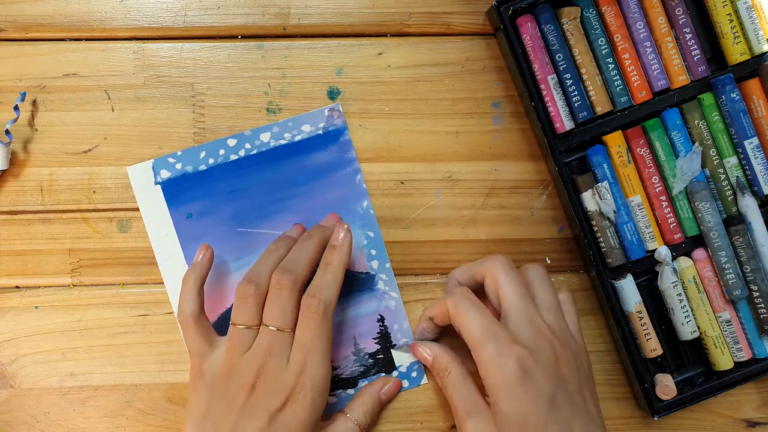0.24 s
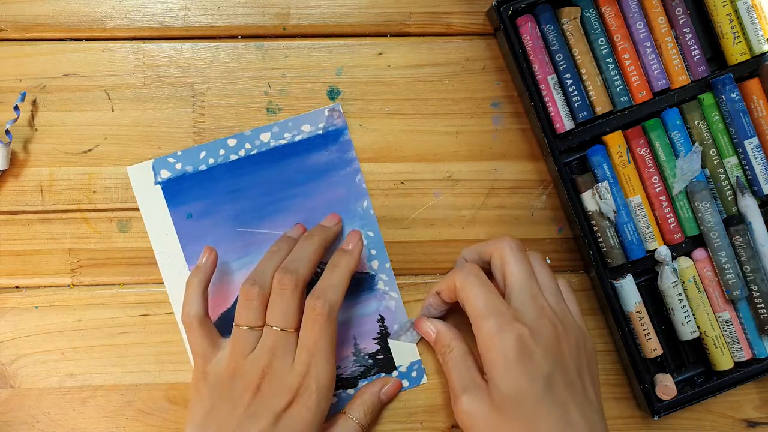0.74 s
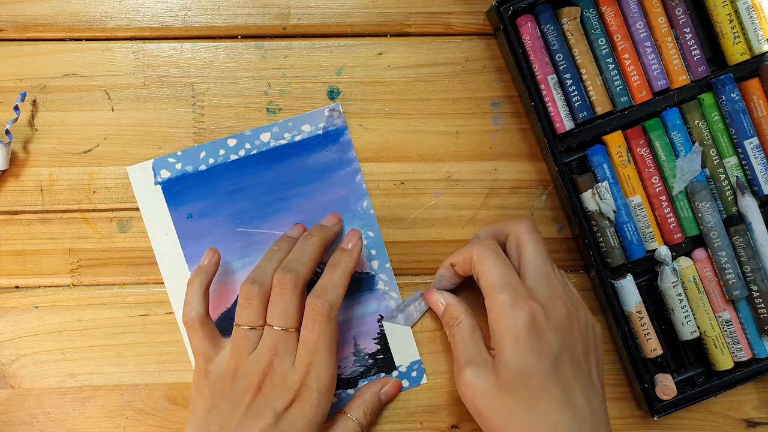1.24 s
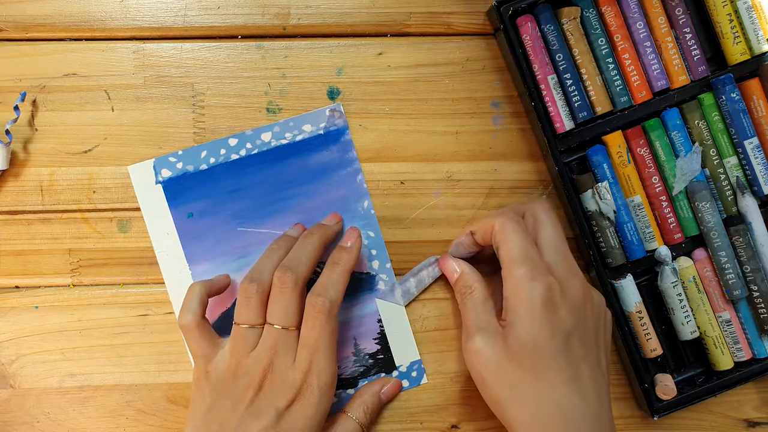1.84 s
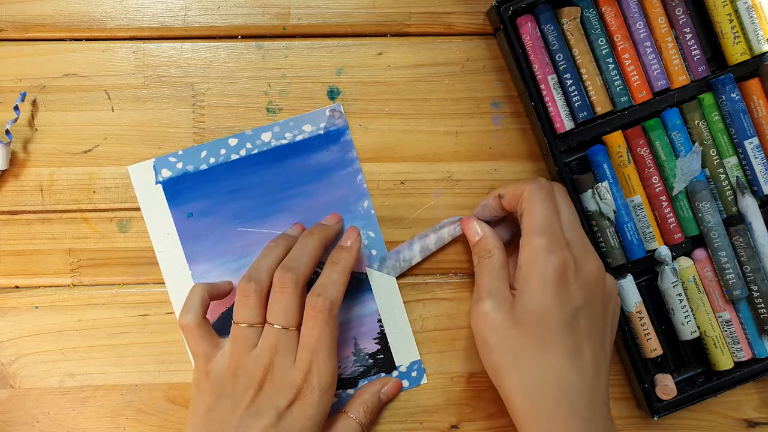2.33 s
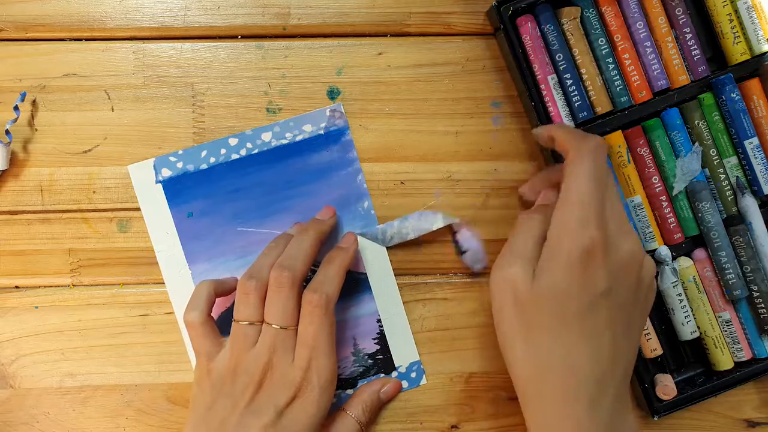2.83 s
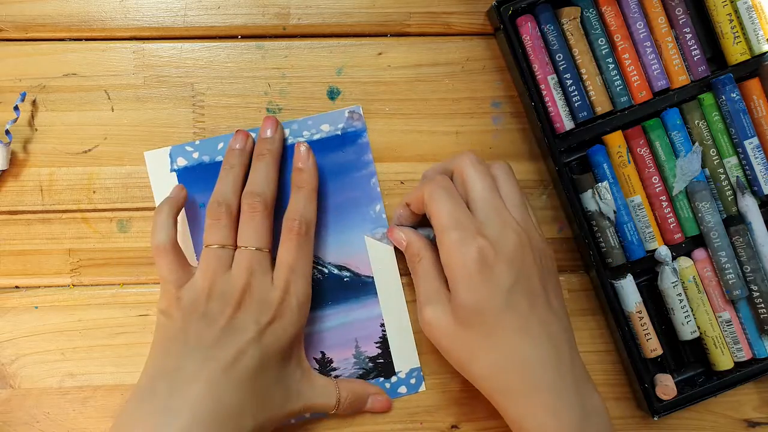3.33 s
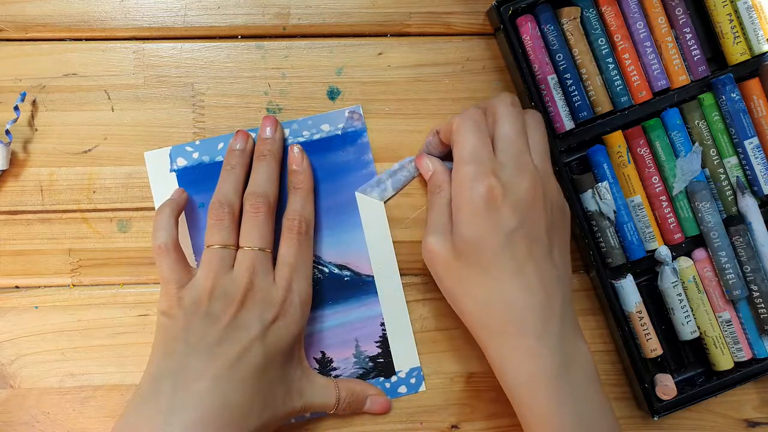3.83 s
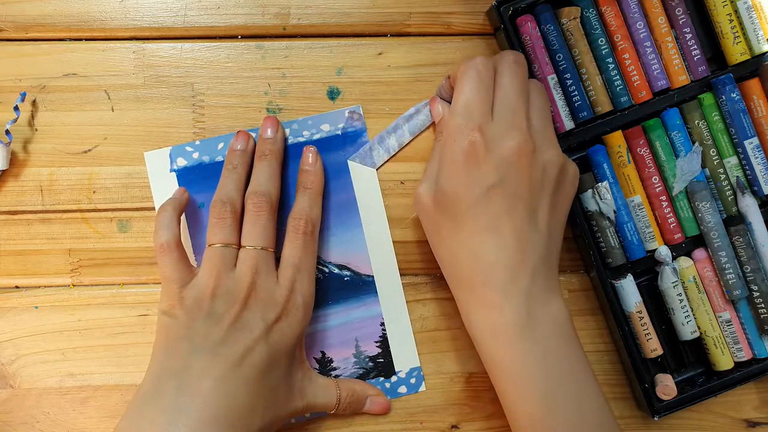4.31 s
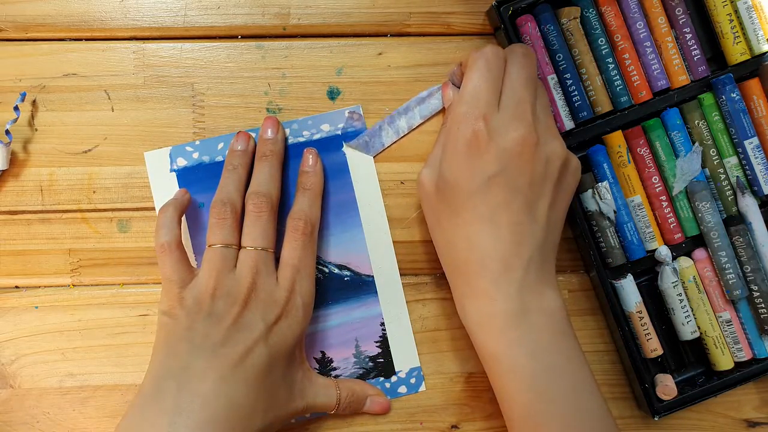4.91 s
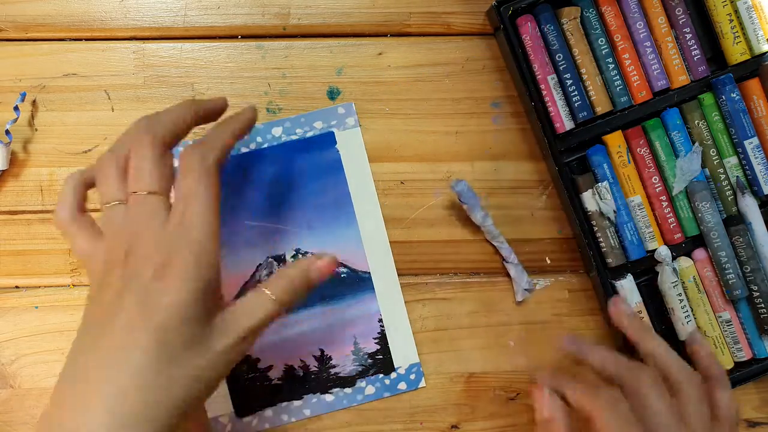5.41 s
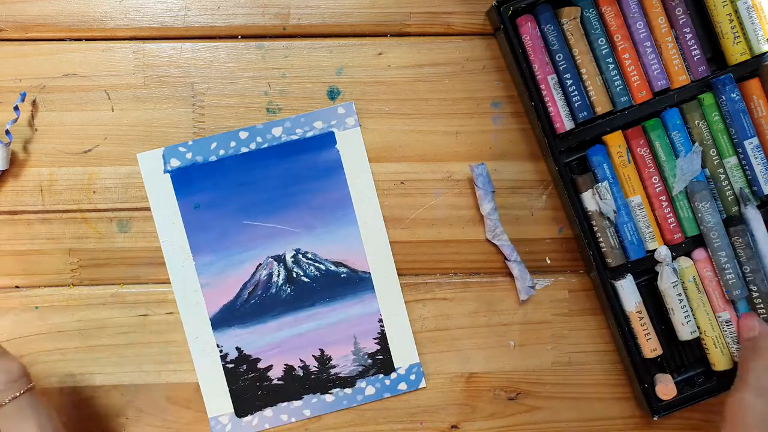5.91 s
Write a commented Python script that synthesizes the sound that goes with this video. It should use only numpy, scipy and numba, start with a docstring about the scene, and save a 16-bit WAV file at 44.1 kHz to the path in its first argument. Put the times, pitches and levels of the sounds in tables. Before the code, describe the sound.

A small room hums steadily with a low, softly throbbing drone, and a faint, distant engine climbs in pitch twice. Right at the start there is a light knock on a wooden desk. From about 0.4 seconds, masking tape is peeled off paper close by, in slow pulls and short tugs: a fine, dry, high crackle dotted with tiny snaps, growing fuller and slightly deeper as the strip lengthens. Near 2.8 seconds a patch rips loose, followed by a knock and, at about 3.1 seconds, a palm settling softly. The peeling resumes from 3.5 to 4.2 seconds, then pauses with a soft low bump. A last pull around 5 seconds ends in bright snaps and crinkles by 5.4 seconds. At about 5.7 seconds the sheet slides dully over the wood, and a light knock and faint rustles follow near 6 seconds.

```python
"""A small room hums, and a far engine climbs in pitch twice. After a knock on a wooden desk, masking
tape is peeled off a sheet of paper in slow pulls and short tugs: glue threads snap in a fine crackle
that deepens as the free strip grows. Near 3 s a patch rips loose, a hand knocks and the palm settles.
The peeling resumes and ends in bright snaps just after 5 s; then hands slide and knock the sheet."""
import sys
import numpy as np
from scipy import signal
from scipy.fft import rfft, irfft
from scipy.io import wavfile
from scipy.ndimage import uniform_filter1d
from numba import njit

SR = 44100
rng = np.random.default_rng(int(sys.argv[2]) if len(sys.argv) > 2 else 0)


def wrap_up_sound(samples):
    """Save the sound to the file named by the first command line argument, as 16-bit audio."""
    columns = np.atleast_2d(samples).T
    # keep every value between -1 and 1, then stretch to whole-number steps
    tamed = np.clip(columns, -1, 1)
    steps = np.round(tamed * 32767).astype(np.int16)
    wavfile.write(sys.argv[1], SR, steps)


N = 271347
TIME = np.arange(N) / SR
BIN_HZ = np.arange(N // 2 + 1) * SR / N


def from_db(db):
    """Decibels to gain."""
    return 10 ** (np.asarray(db) / 20)


def unit_rms(x):
    """Scale to unit power."""
    return x / np.sqrt(np.mean(x ** 2) + 1e-20)


def in_time(rows):
    """Each column of a time curve at every sample."""
    times_s, *columns = np.transpose(rows)
    return [np.interp(TIME, times_s, column) for column in columns]


def at_hz(points, hz):
    """Read a table on a log-frequency axis."""
    known_hz, values = np.transpose(points)
    return np.interp(np.log(hz + 1e-3), np.log(known_hz), values)


def pan(balance_db):
    """Channel gains for a left-minus-right balance."""
    return from_db(np.array([[.5], [-.5]]) * balance_db)


def drift(rate_hz):
    """Slow random curve, rms 1."""
    return unit_rms(irfft(rfft(rng.standard_normal(N)) / (1 + (BIN_HZ / rate_hz) ** 2), N))


def strokes(rows, rise_s, fall_s):
    """Envelope of events that build up, hold and die away; their powers add."""
    power = np.zeros(N)
    for start_s, length_s, db in rows:
        outside = np.maximum(start_s - TIME, 0) / rise_s
        outside += np.maximum(TIME - start_s - length_s, 0) / fall_s
        power += (from_db(db) * np.exp(-np.minimum(outside, 20))) ** 2
    return np.sqrt(power)


def highpass(order, hz):
    """Butterworth high-pass sections."""
    return signal.butter(order, hz, "high", fs=SR, output="sos")


def resonate(x, hz, width_hz):
    """Two-pole resonance, peak gain 1."""
    r = np.exp(-np.pi * width_hz / SR)
    feedback = [1, -2 * r * np.cos(2 * np.pi * hz / SR), r * r]
    return signal.lfilter(np.array([1, 0, -1]) * (1 - r * r) / 2, feedback, x + 1e-18)


def narrow_band(noise, hz, stage_width_hz):
    """Noise through two equal resonances in series, rms 1."""
    return unit_rms(resonate(resonate(noise, hz, stage_width_hz), hz, stage_width_hz))


@njit
def moving_filter(x, step, damping):
    """State-variable filter tuned by step = tan(pi hz / SR); returns high-pass and band-pass."""
    high, peak, band, low = np.zeros(len(x)), np.zeros(len(x)), 0., 0.
    for i in range(len(x)):
        g = step[i]
        high[i] = (x[i] - (damping + g) * band - low) / (1 + g * (damping + g))
        peak[i] = band + g * high[i]
        low += 2 * g * peak[i]
        band += 2 * g * high[i]
    return high, damping * peak


# Stereo image. Each row: frequency in Hz, left-right correlation.
EAR_CORRELATION = [(30, 0.76), (70, 0.99), (140, 0.97), (290, 0.97), (640, 0.51), (1410, 0.36), (3100, 0),
                   (15000, 0.14)]

def two_ears(mid, side, hz):
    """Left and right are alike in the bass, nearly unrelated in the treble."""
    alike = np.clip(at_hz(EAR_CORRELATION, hz), -1, 1)
    return np.sqrt(1 + alike) * mid + np.sqrt(1 - alike) * side * [[1], [-1]]


# Balance of diffuse sound. Each row: frequency in Hz, left minus right in dB.
ROOM_BALANCE = [(60, 2.5), (130, 0), (290, -2.5), (640, 0.2), (1410, 1.5), (8000, 1)]

def room_noise(spectrum):
    """Diffuse stereo noise of a given spectrum, rms 1."""
    ears = two_ears(*rfft(rng.standard_normal((2, N))), BIN_HZ)
    coloured = ears * from_db(at_hz(spectrum, BIN_HZ))
    return unit_rms(irfft(coloured * pan(at_hz(ROOM_BALANCE, BIN_HZ)), N))


# Background spectrum. Each row: frequency in Hz, relative density in dB.
AIR_SPECTRUM = [(20, -17), (50, -25), (75, -4), (110, 2.5), (170, 1), (280, -6.5), (420, -17), (700, -16),
                (1300, -19), (2000, -28.5), (2800, -37), (4500, -41), (8000, -46), (15000, -59.5)]
# Background swell. Each row: time in seconds, level in dB.
AIR_LEVEL = [(0.25, -54), (0.7, -56.5), (1.8, -55), (2.6, -54.5), (3.3, -55), (4.0, -53.5), (6.0, -55.5)]
# Room resonances. Each row: frequency in Hz, width in Hz, level in dB.
AIR_MODES = [(290.5, 28, -67), (346.3, 16, -69.5), (438.2, 6.6, -74.5), (540, 50, -67), (948, 47, -72),
             (1400, 22, -80.5), (2000, 38, -93)]

def air():
    """Near-steady rumble and hiss, with a few room resonances standing out."""
    white = room_noise([(20, 0), (20000, 0)])
    modes = sum(from_db(db) * narrow_band(white, hz, 1.57 * width_hz) for hz, width_hz, db in AIR_MODES)
    return from_db(in_time(AIR_LEVEL)[0]) * room_noise(AIR_SPECTRUM) + modes


# The engine climbs, lets off, climbs again. Each row: time in seconds, firing rate in Hz, level in dB.
ENGINE_RUN = [(0.0, 147, -63), (0.84, 159, -66), (0.93, 161, -56), (1.14, 166, -58), (1.24, 168, -51.5),
              (1.46, 169, -64.5), (1.58, 174, -53.5), (1.8, 180, -54), (2.25, 184, -57), (2.65, 188, -56.5),
              (2.92, 196, -56), (3.05, 198, -58), (3.4, 103, -60), (4.2, 119, -64), (4.75, 129, -58.5),
              (5.4, 134, -50), (6.15, 138, -65)]
# Firing orders. Each row: multiple of the firing rate, relative level in dB.
ENGINE_ORDERS = [(1, 5), (2, -20), (3, -16), (4, -20)]

def engine(jitter=0.0088, flutter_db=3, mode_hz=555, mode_half_width_hz=16, mode_db=13):
    """Only the lowest firing orders come indoors; one that crosses a room resonance swells."""
    firing_hz, level_db = in_time(ENGINE_RUN)
    phase = 2 * np.pi * np.cumsum(firing_hz * (1 + jitter * drift(12.8))) / SR
    orders = 0
    for order, db in ENGINE_ORDERS:
        swell_db = mode_db / (1 + ((order * firing_hz - mode_hz) / mode_half_width_hz) ** 2)
        orders += from_db(db + swell_db + flutter_db * drift(8)) * np.sin(order * phase)
    return from_db(level_db) * unit_rms(orders) * pan(-0.37)


# Low drone of the room. Each row: time in seconds, level in dB.
DRONE_LEVEL = [(0.0, -48.5), (0.42, -50.5), (0.65, -60), (1.35, -59.5), (2.05, -51), (2.3, -58), (2.8, -52),
               (3.3, -57.5), (3.85, -54), (4.15, -63.5), (5.0, -66.5), (5.55, -50), (6.15, -55.5)]
# Booms in the hum. Each row: start in seconds, length in seconds, level in dB, pitch in Hz.
HUM_BOOMS = [(0.036, 0.032, -42.5, 113.2), (0.258, 0.016, -44.5, 111.9), (0.477, 0.02, -45.5, 118.7),
             (0.717, 0.013, -49.5, 118.7), (1, 0.02, -45, 117), (1.463, 0.078, -44, 117.6),
             (3.117, 0.097, -46, 112.6), (3.57, 0.056, -45.5, 105), (3.765, .02, -51, 112.7),
             (3.834, 0.067, -46.5, 111.1), (4.012, 0.057, -40.5, 112), (4.219, 0.072, -43, 118.6),
             (4.327, 0.034, -33, 114.3), (4.409, 0.011, -40, 119.8), (4.523, 0.033, -43, 109.1),
             (4.648, 0.034, -43, 123.1), (4.747, 0.028, -46, 123.2), (4.838, 0.014, -49, 113.6),
             (4.935, 0.024, -44, 118.5), (5.026, .025, -44.5, 118.6), (5.16, 0.012, -47, 118),
             (5.217, 0.023, -46.5, 128), (5.364, 0.013, -45, 114.7), (5.448, 0.024, -45, 118.5),
             (6.06, 0.03, -43.5, 113)]

def hum(drone_hz=112.3, wander_hz=6.86, flutter_db=2.0, lowest_hz=68):
    """A low drone wavers in pitch and level and throbs in soft booms."""
    flutter = from_db(flutter_db * drift(20))
    drone_phase = 2 * np.pi * np.cumsum(drone_hz + wander_hz * drift(13.12)) / SR
    drone = from_db(in_time(DRONE_LEVEL)[0]) * unit_rms(flutter * np.sin(drone_phase))
    boom_hz = in_time([(start_s + length_s / 2, hz) for start_s, length_s, _, hz in HUM_BOOMS])[0]
    boom_phase = 2 * np.pi * np.cumsum(boom_hz) / SR + rng.uniform(0, 2 * np.pi)
    boom_rms = strokes([row[:3] for row in HUM_BOOMS], rise_s=0.012, fall_s=0.018)
    booms = boom_rms * np.sqrt(2) * np.sin(boom_phase)
    return signal.sosfilt(highpass(4, lowest_hz), drone + booms) * pan(-0.6)


# Slides over the desk. Each row: start in seconds, length in seconds, level in dB.
PAPER_SLIDES = [(4.32, 0.05, -65), (5.707, 0.021, -48), (5.76, 0.049, -63), (6.142, 0.01, -59.5)]
# Rubbing spectrum. Each row: frequency in Hz, relative density in dB.
SLIDE_SPECTRUM = [(150, -11), (300, 1), (500, 10.5), (800, 3), (1300, 8), (2200, -5), (3100, -22),
                  (4500, -21.5), (7000, -42), (14000, -63)]

def slide(grain_db=2.0):
    """Paper and skin rub dully and unevenly over wood."""
    envelope = strokes(PAPER_SLIDES, rise_s=0.0049, fall_s=0.04)
    return envelope * from_db(grain_db * drift(90)) * room_noise(SLIDE_SPECTRUM)


# Palm landings. Each row: start in seconds, length in seconds, level in dB.
PALM_LANDINGS = [(3.125, 0.04, -51), (4.32, 0.027, -57)]
# Palm spectrum. Each row: frequency in Hz, relative density in dB.
PALM_SPECTRUM = [(80, -21), (170, 0), (300, 7.5), (450, -14), (1500, -22.5), (3000, -41), (12000, -66)]

def palm():
    """The holding hand settles softly on the sheet."""
    return strokes(PALM_LANDINGS, rise_s=0.012, fall_s=0.051) * room_noise(PALM_SPECTRUM)


# Centres of thud, body, clack and tick in Hz.
KNOCK_CENTRES_HZ = [220, 1400, 2900, 6500]

def knock_gain(knock, hz, bass_db=-3, top_db=-9):
    """How hard one knock drives a given frequency."""
    thud, body, clack, tick = knock[1:5]
    levels_db = [thud + bass_db, thud, body, clack, tick, tick + top_db]
    spectrum = list(zip([170, *KNOCK_CENTRES_HZ, 14000], levels_db))
    return from_db(at_hz(spectrum, hz))


# Knocks. Each row: start in seconds; thud, body, clack and tick drive in dB; relative desk ring in dB;
# the struck spot's pitch in Hz, level in dB and T60 in seconds.
DESK_KNOCKS = [(0.0681, -60, -56, -62, -57.5, 0, 3430, -68, 0.06),
               (0.0754, -39, -49, -63, -51.5, 4.5, 540, -41.5, 0.011),
               (0.0869, -42, -62, -58, -65, 1, 1390, -50, 0.02),
               (2.9461, -44, -52, -55.5, -56.5, -4, 1300, -52, 0.012),
               (2.9516, -59, -49.5, -53, -58, -8, 950, -44.5, 0.025),
               (5.8673, -62, -53, -60, -53.5, -15, 2000, -43.5, 0.028),
               (5.872, -55, -48.5, -65, -62, -14, 2250, -49, 0.015),
               (5.889, -76, -66, -57, -57, -12, 2160, -60, 0.056)]
# Decay of a knock's tail. Each row: frequency in Hz, T60 in seconds.
TAIL_T60 = [(200, 0.029), (1000, 0.34), (3500, 0.16), (14000, 0.13)]

def knocks(crack_t60_s=0.0085, tail_db=-8, gain_db=-12):
    """Fingers and tape strike desk and sheet: a short crack, then a tail that dies band by band."""
    out, t = np.zeros((2, N + SR)), TIME[:SR // 3]
    crack = from_db(-60 * t / crack_t60_s)
    edges_hz = np.geomspace(140, 16000, num=25)
    for low, high in zip(edges_hz, edges_hz[1:]):
        hz = np.sqrt(low * high)
        band = signal.butter(2, [low, high], "band", fs=SR, output="sos")
        tail = from_db(tail_db - 60 * t / at_hz(TAIL_T60, hz))
        for knock in DESK_KNOCKS:
            start = round(knock[0] * SR)
            decay = knock_gain(knock, hz) * (crack + tail)
            drive = two_ears(*rng.standard_normal((2, len(t))), hz) * decay
            out[:, start:start + len(t)] += signal.sosfilt(band, drive * np.sqrt(SR / (high - low)))
    return from_db(gain_db) * out[:, :N]


# Modes of desk and sheet. Each row: frequency in Hz, relative level in dB, T60 in seconds.
DESK_MODES = [(301, -6, 0.22), (542, 4.5, 0.2), (870, 5, 0.087), (1314, 0, 0.13), (1554, -4, 0.15),
              (1980, -3, 0.078), (3030, -9, 0.09), (3380, -8, 0.11), (4580, -16, 0.12)]

def desk_ring(modes_db=-11, cluster_hz=3280, cluster_db=-8, cluster_t60_s=0.17):
    """Each knock rings the desk's modes, a rough cluster of higher ones and the struck spot."""
    out = np.zeros((2, N))
    cluster = narrow_band(rng.standard_normal((2, N)), cluster_hz, stage_width_hz=560)
    for knock in DESK_KNOCKS:
        ring_db, spot_hz, spot_db, spot_t60_s = knock[5:]
        start = round(knock[0] * SR)
        t = TIME[:min(SR // 3, N - start)]
        span = slice(start, start + len(t))
        cluster_decay = from_db(cluster_db + ring_db - 60 * t / cluster_t60_s)
        out[:, span] += knock_gain(knock, cluster_hz) * cluster_decay * cluster[:, span]
        modes = [(hz, knock_gain(knock, hz) * from_db(db + ring_db + modes_db), t60_s)
                 for hz, db, t60_s in DESK_MODES]
        for hz, gain, t60_s in modes + [(spot_hz, from_db(spot_db), spot_t60_s)]:
            phase = 2 * np.pi * hz * t
            out[:, span] += gain * from_db(-60 * t / t60_s) * two_ears(np.sin(phase), np.cos(phase), hz)
    return out


# Resonances of tape and sheet. Each row: frequency in Hz, width in Hz, gain in dB.
SHEET_MODES = [(4950, 620, 0), (6280, 550, -8.5), (7030, 150, -5), (8030, 930, -13.5), (10560, 1400, -13),
               (12960, 720, -10.5), (15800, 1600, -13.5)]
# Modes of the free strip. Each row: multiple of the lowest, relative width, relative gain in dB.
STRIP_MODES = [(1, 0.07, -6), (1.41, 0.088, -8.5)]
# The free strip. Each row: time in seconds, lowest mode in Hz, radiation cutoff in Hz,
# treble gain in dB, left minus right in dB.
FREE_STRIP = [(0.72, 11300, 8800, -12, 10), (0.86, 8560, 7100, 0, 9), (1.3, 8450, 7560, 2, 12),
              (1.51, 8400, 7300, -7, 17), (1.56, 7150, 7020, -1, 13), (1.95, 7170, 6660, 13, 11),
              (2.3, 7100, 5770, 4, 3), (2.85, 7060, 5700, -5, 0.5), (3.5, 7340, 5377, -9, 9),
              (3.65, 6600, 5740, -2, 8), (3.82, 6060, 5230, 1, 6), (4.08, 6330, 5167, 6, 3),
              (4.95, 6770, 6170, 4, 6), (5.16, 7760, 6000, -17, 5), (5.26, 11000, 7680, 6, 1)]

def tape_body(ears, ring_db=0, broad_db=-20, crunch_db=-29, treble_hz=11000, wobble=0.033):
    """Snaps ring the sheet and the free strip; a short strip radiates only the highest tones."""
    strip_hz, cutoff_hz, treble_db, _ = in_time(FREE_STRIP)
    tone = sum(from_db(db) * resonate(ears, hz, width_hz) for hz, width_hz, db in SHEET_MODES)
    tone += from_db(broad_db) * ears
    strip_hz = strip_hz * (1 + wobble * drift(12))   # the strip tightens and slackens
    cutoff_step = np.tan(np.pi * cutoff_hz / SR)
    for ear in range(2):
        for multiple, width, db in STRIP_MODES:
            step = np.tan(np.pi * np.minimum(multiple * strip_hz / SR, 4 / 9))
            tone[ear] += from_db(db + ring_db) * moving_filter(ears[ear] + 1e-18, step, width)[1]
        for damping in (.22, .7, 1.2, 1.6, 1.85, 1.98):   # 12th-order high-pass
            tone[ear] = moving_filter(tone[ear], cutoff_step, damping)[0]
    treble = signal.sosfiltfilt(highpass(2, treble_hz), tone)
    crunch = from_db(crunch_db) * resonate(ears, hz=4000, width_hz=1500)
    return tone + (from_db(treble_db) - 1) * treble + crunch


def scatter(pulses, desk_db=-4, desk_t60_s=0.08, wall_db=-3, wall_t60_s=0.17):
    """Each pulse arrives directly, then scatters off desk and hands, then off the walls."""
    t = TIME[:SR // 3]
    desk = from_db(desk_db) * unit_rms(from_db(-60 * t / desk_t60_s))
    walls = from_db(wall_db) * unit_rms(from_db(-60 * t / wall_t60_s) * (t > .003))
    echo_power = signal.fftconvolve(pulses ** 2, (desk ** 2 + walls ** 2) / len(t))[:N]
    diffuse = np.sqrt(np.abs(echo_power)) * rng.standard_normal((2, N))
    direct = np.stack([pulses, np.roll(pulses, 1)])   # the right ear is a little farther
    balance_db = in_time(FREE_STRIP)[-1]
    return direct * pan(balance_db) + diffuse * pan(0.74)


def reflections(ears, echo_db=-17, count=6):
    """Hard surfaces nearby return a few early echoes, which comb the treble."""
    lags = (rng.uniform(.001, .012, count) * SR).astype(int)
    return ears + from_db(echo_db) * sum(np.pad(ears, ((0, 0), (lag, 0)))[:, :N] for lag in lags)


# Rips and rustles. Each row: start in seconds, length in seconds, drive in dB, relative crunch in dB.
TAPE_RIPS = [(2.786, 0.0022, -56, -13), (2.794, 0.1, -82, 1), (2.826, 0.033, -68.5, -9.5),
             (2.916, 0.0021, -65, -1), (4.119, 0.0048, -85, 15.5), (5.129, 0.036, -60.5, -7.5),
             (5.276, 0.022, -71, -7.5), (5.353, 0.023, -71.5, -4), (5.934, 0.03, -90.5, 15),
             (6.027, 0.025, -94.5, 16), (6.081, 0.0038, -80, 4)]

def rips(tape_gain_db=4, crunch_gain_db=8, grain_db=3):
    """A patch of glue lets go in a dense run of clicks, and the paper crunches under it."""
    runs, crunches = np.zeros((2, N))
    for start_s, length_s, db, crunch_db in TAPE_RIPS:
        run = from_db(db) * ((TIME > start_s) & (TIME < start_s + length_s))
        runs += run
        crunches += from_db(crunch_db) * run
    threads = rng.standard_normal(N) * from_db(grain_db * drift(600))
    tape = tape_body(scatter(runs * threads), ring_db=-3, broad_db=-6.5)
    paper = resonate(scatter(crunches * threads), hz=2270, width_hz=2600)
    return from_db(tape_gain_db) * tape + from_db(crunch_gain_db) * paper


# Single glue snaps and crinkles. Each row: start in seconds, drive in dB, ring in Hz.
GLUE_SNAPS = [(0.3962, -47, 11500), (0.4261, -41, 12000), (0.681, -46, 11500), (1.29, -45, 8500),
              (1.3116, -45, 8500), (1.3497, -41, 8500), (1.3698, -42, 8500), (1.471, -45, 8500),
              (1.4866, -39, 8500), (1.4944, -46, 8500), (1.5487, -47, 8000), (1.7748, -47, 10200),
              (1.7804, -45, 10200), (1.9545, -40, 10500), (1.9911, -40, 10200), (2.0756, -43, 10000),
              (2.088, -43, 10000), (2.0985, -41, 7200), (2.158, -41, 7200), (2.2847, -42, 7200),
              (2.3045, -39, 7200), (2.3875, -43, 7200), (2.4155, -46, 10000), (2.5077, -43, 12500),
              (2.5384, -42, 7200), (2.6996, -40, 7000), (2.724, -46, 13000), (2.7772, -42, 8000),
              (2.7872, -38, 7300), (2.7893, -28, 7600), (2.7982, -42, 7400), (2.846, -34, 13000),
              (2.8595, -42, 8000), (2.9061, -44, 10500), (2.9174, -29, 8200), (4.0907, -41, 14500),
              (5.1342, -30.5, 12000), (5.1808, -37, 13000), (5.225, -49, 12000), (5.2412, -36, 12500),
              (5.2463, -28, 12000), (5.2685, -38, 10900), (5.3535, -47, 12500), (5.3688, -34, 12800)]

def snaps(ring_width_hz=1400, ring_db=3, click_db=-9, lowest_hz=6200):
    """A strong spot of glue gives way with one dry click, which rings its own patch of tape."""
    times_s, drives_db, rings_hz = np.transpose(GLUE_SNAPS)
    starts = [round(start_s * SR) for start_s in times_s]
    clicks = np.zeros(N)
    clicks[starts] = from_db(drives_db)
    ears = scatter(clicks, desk_db=-3, desk_t60_s=0.007, wall_t60_s=0.07)
    out = from_db(click_db) * ears
    for start, end, hz in zip(starts, starts[1:] + [N], rings_hz):
        out[:, start:end] += from_db(ring_db) * resonate(ears[:, start:end], hz, ring_width_hz)
    return signal.sosfilt(highpass(4, lowest_hz), out + 1e-18)


# Pulls: the tape creeps off steadily. Each row: start in seconds, length in seconds, drive in dB.
SLOW_PULLS = [(0.345, 0.4, -83.5), (1.03, 0.59, -79), (1.69, 1.03, -77), (3.47, 0.71, -73),
              (4.94, 0.13, -79.5)]
# Tugs: one burst of crackle each. Each row: start in seconds, length in seconds, drive in dB.
SHORT_TUGS = [(0.388, 0.12, -71.5), (0.533, 0.033, -76.5), (0.672, 0.026, -78), (0.891, 0.029, -68),
              (1.227, 0.069, -72), (1.31, 0.07, -68.5), (1.463, 0.03, -70), (1.869, 0.06, -68),
              (1.93, 0.034, -65), (2.089, 0.015, -65.5), (2.271, 0.038, -65.5), (2.367, 0.017, -69),
              (2.515, 0.043, -63.5), (2.591, 0.033, -66), (2.692, 0.01, -73.5), (3.2, 0.019, -82.5),
              (3.467, 0.016, -64), (3.613, 0.039, -67.5), (3.716, 0.086, -65), (3.827, 0.03, -61.5),
              (3.892, 0.013, -61.5), (3.972, 0.051, -68), (4.038, 0.029, -62.5), (4.419, 0.025, -80.5),
              (4.944, 0.015, -71), (5.058, 0.097, -70.5)]

def peel(reference_threads_per_s=2000, reference_db=-69.0, spread_db=2.0, flutter_db=1.0, gain_db=1.5):
    """Glue threads break at random; a faster pull breaks more of them, in uneven surges."""
    surge = strokes(SLOW_PULLS + SHORT_TUGS, rise_s=0.014, fall_s=0.017)
    surge *= from_db(flutter_db * drift(24))
    threads_per_s = reference_threads_per_s * np.sqrt(surge / from_db(reference_db))
    chance = np.clip(threads_per_s / SR, .004, .6)
    sizes = from_db(spread_db * np.minimum(rng.exponential(1, N), 5.5)) * rng.choice([-1, 1], N)
    breaks = sizes * (rng.random(N) < chance) / np.sqrt(chance)
    crackle = tape_body(reflections(scatter(breaks)))
    running_rms = np.sqrt(uniform_filter1d(np.mean(crackle ** 2, axis=0), size=SR // 20) + 1e-12)
    return surge * from_db(gain_db) * crackle / running_rms


def scene():
    """Tape and hands close by, over the sounds of the room."""
    tape = peel() + snaps() + rips()
    hands = knocks() + desk_ring() + slide() + palm()
    return tape + hands + hum() + engine() + air()


def record(dry, cutoff_hz=15800):
    """Steep elliptic low-pass."""
    return signal.sosfilt(signal.ellip(12, .1, 80, cutoff_hz, fs=SR, output="sos"), dry)


dry = scene()
out = record(dry)
wrap_up_sound(out)
```